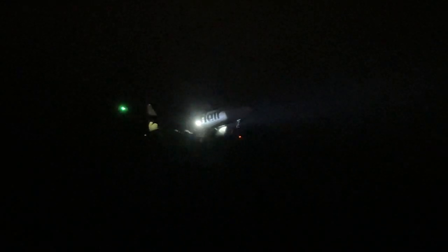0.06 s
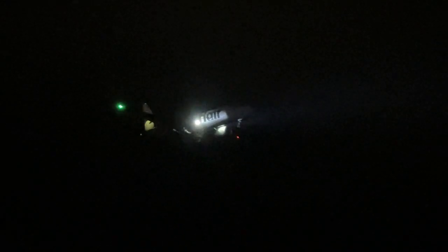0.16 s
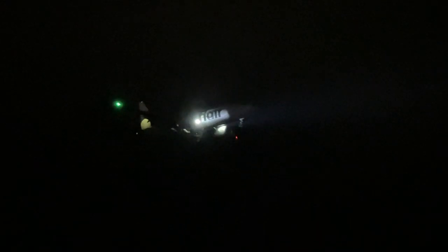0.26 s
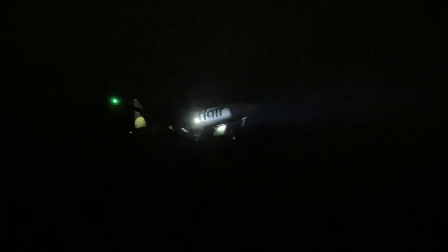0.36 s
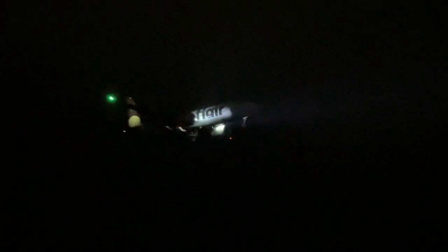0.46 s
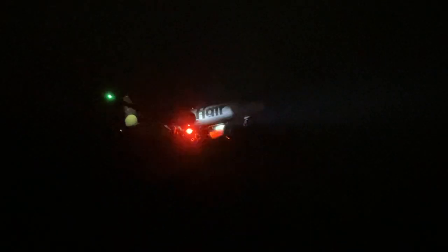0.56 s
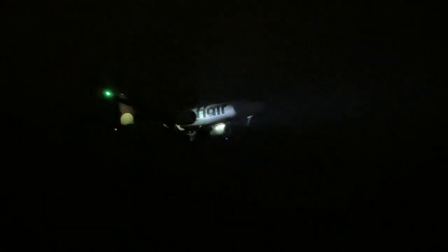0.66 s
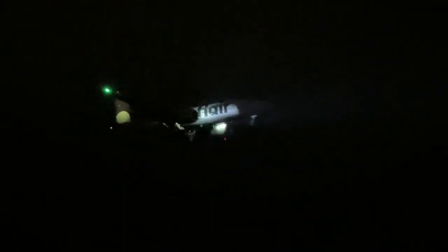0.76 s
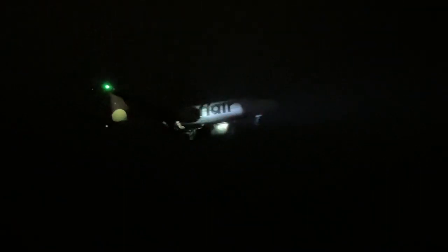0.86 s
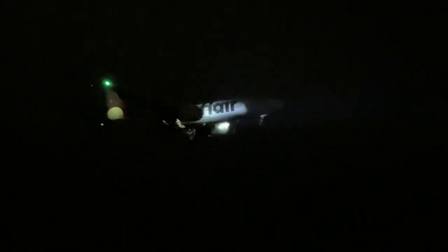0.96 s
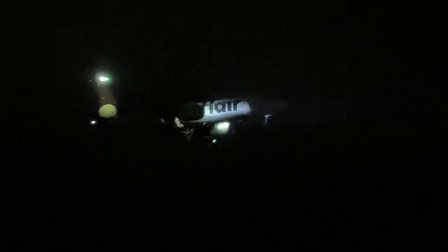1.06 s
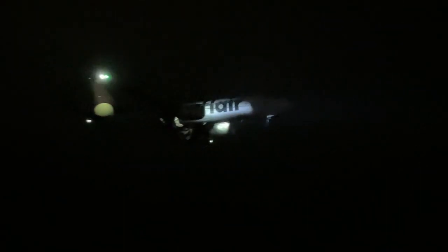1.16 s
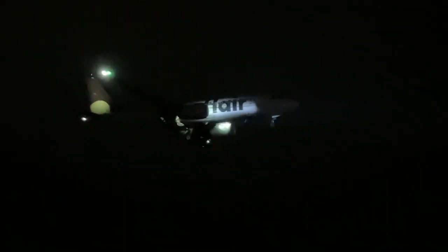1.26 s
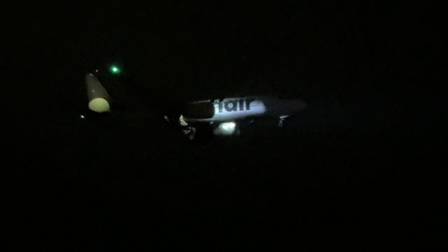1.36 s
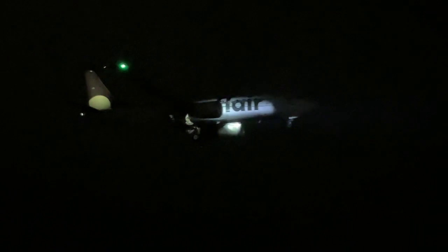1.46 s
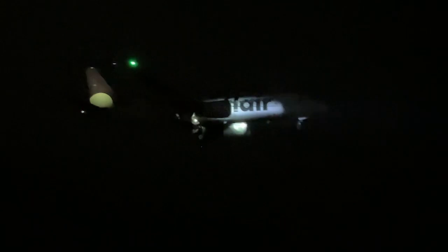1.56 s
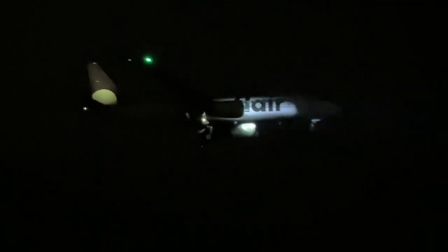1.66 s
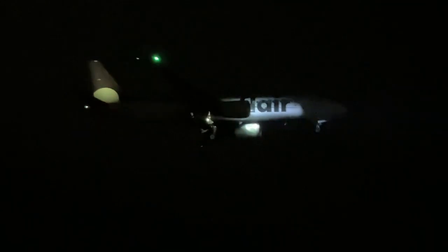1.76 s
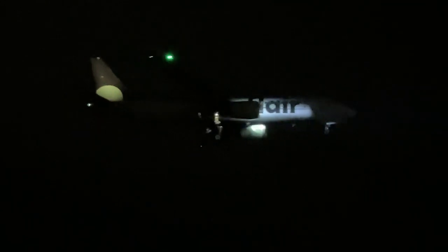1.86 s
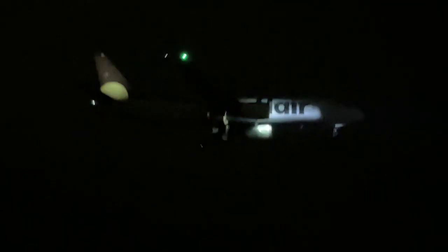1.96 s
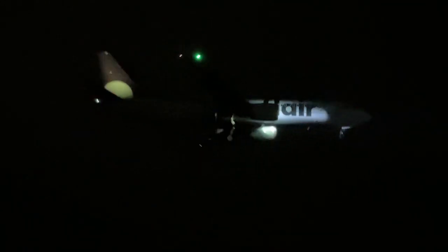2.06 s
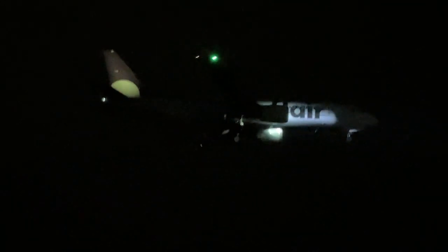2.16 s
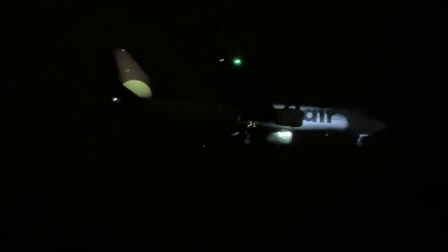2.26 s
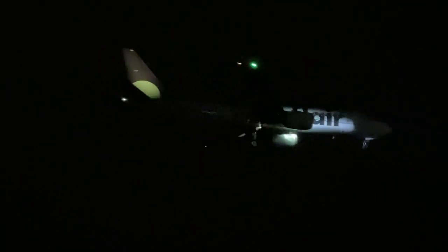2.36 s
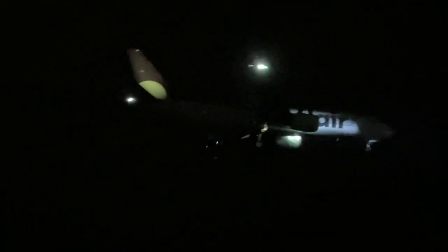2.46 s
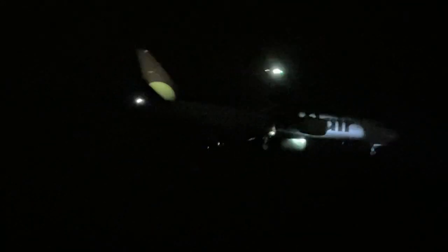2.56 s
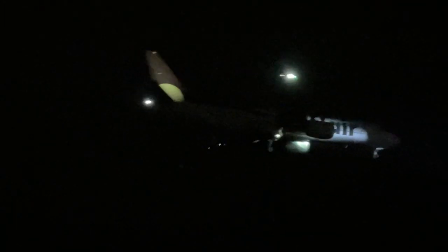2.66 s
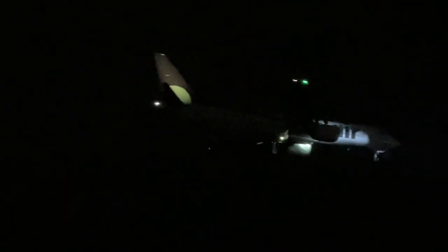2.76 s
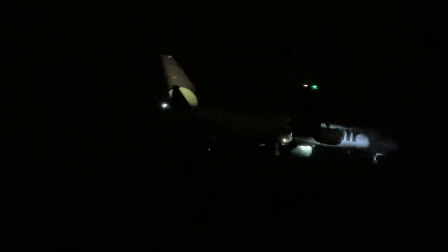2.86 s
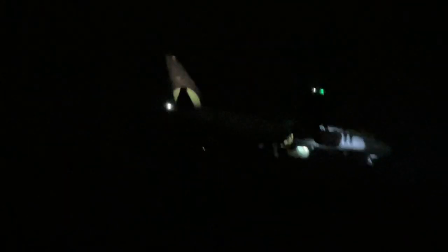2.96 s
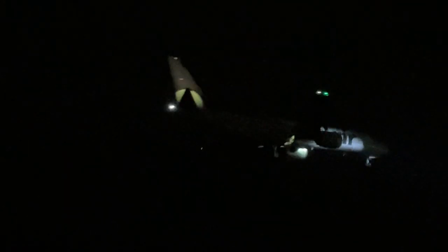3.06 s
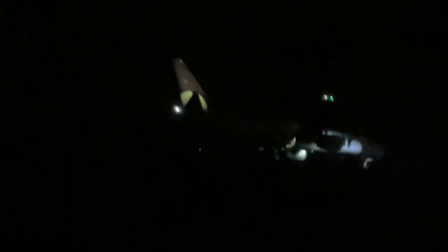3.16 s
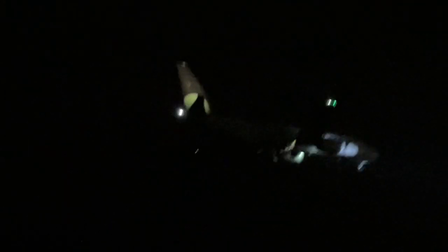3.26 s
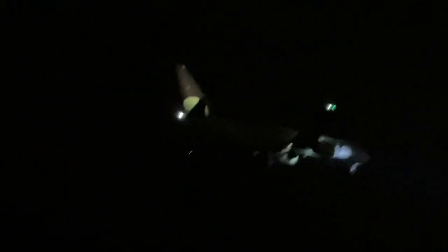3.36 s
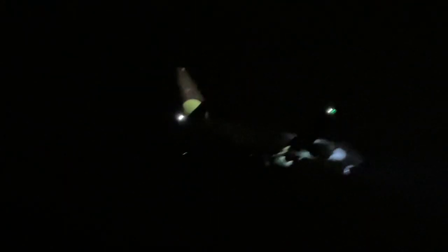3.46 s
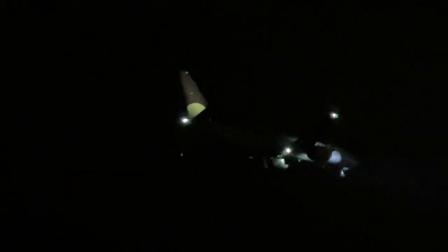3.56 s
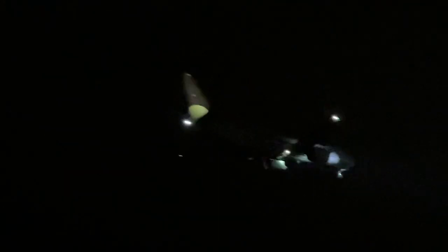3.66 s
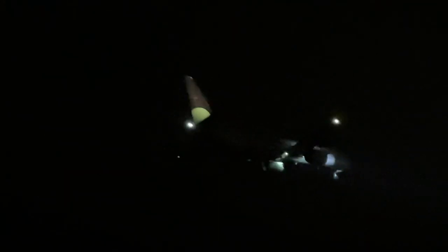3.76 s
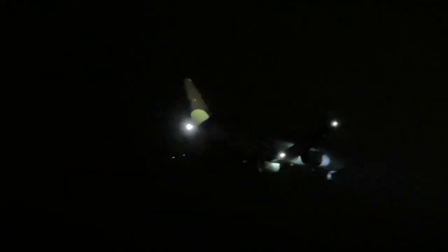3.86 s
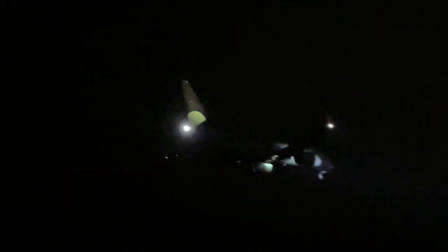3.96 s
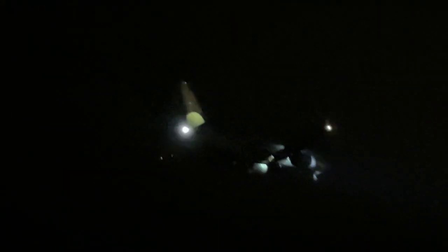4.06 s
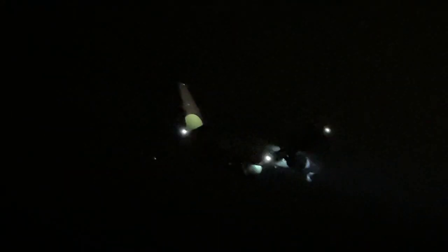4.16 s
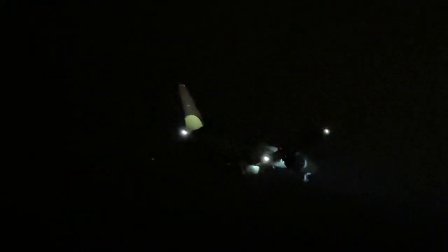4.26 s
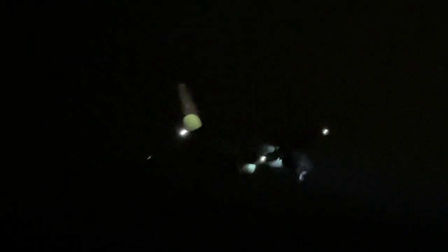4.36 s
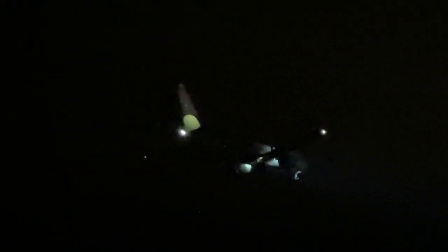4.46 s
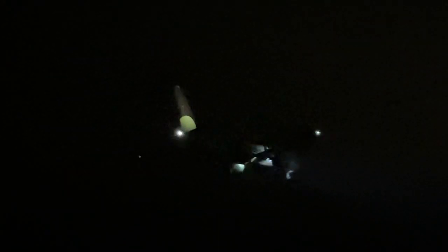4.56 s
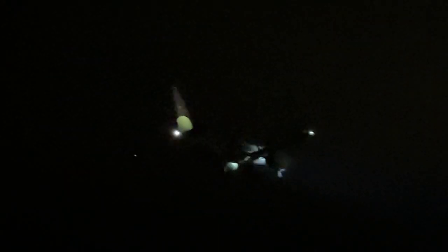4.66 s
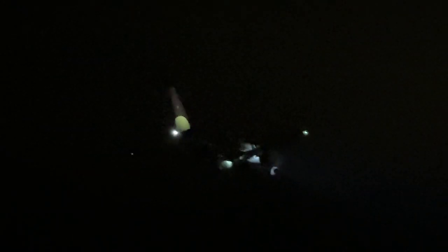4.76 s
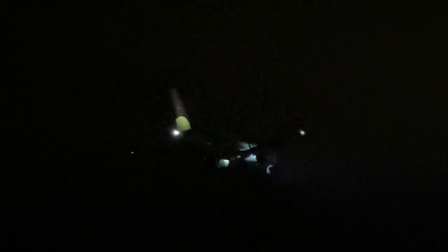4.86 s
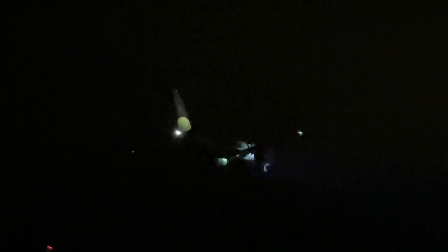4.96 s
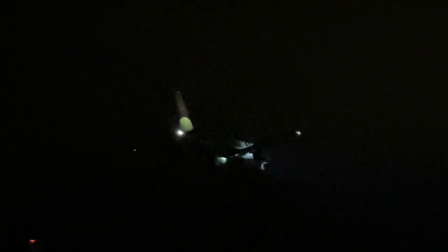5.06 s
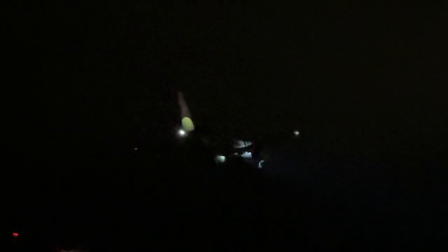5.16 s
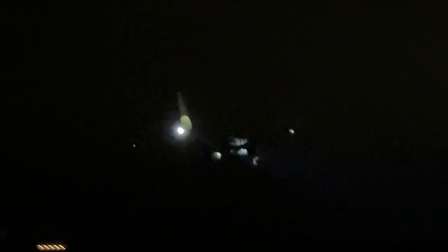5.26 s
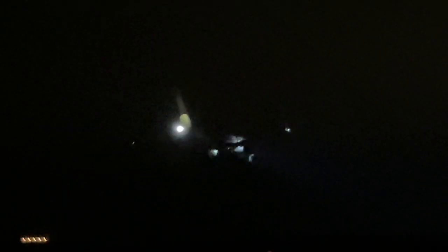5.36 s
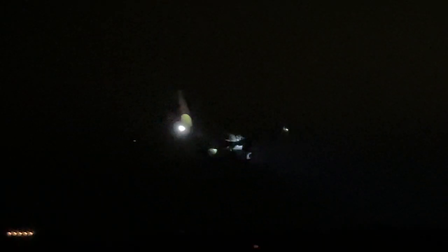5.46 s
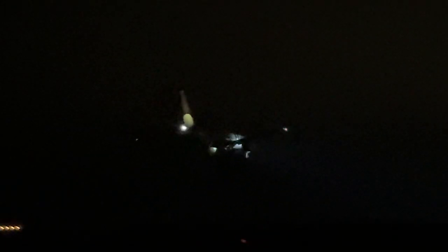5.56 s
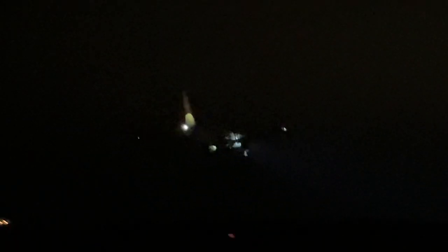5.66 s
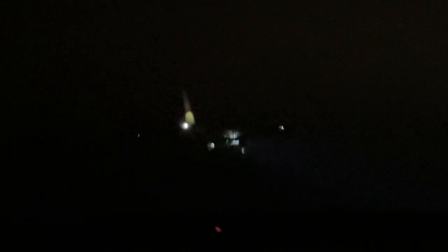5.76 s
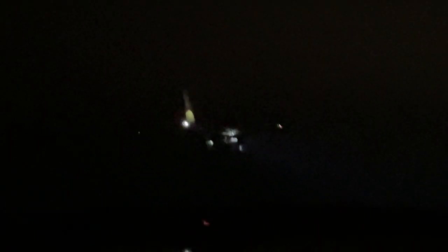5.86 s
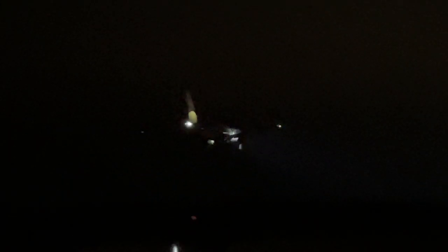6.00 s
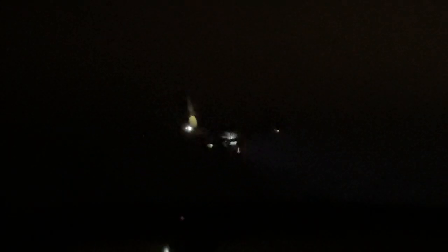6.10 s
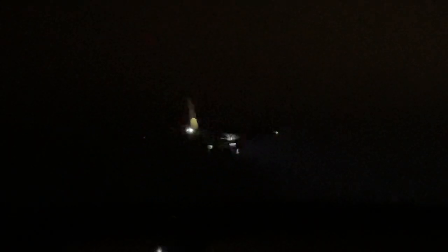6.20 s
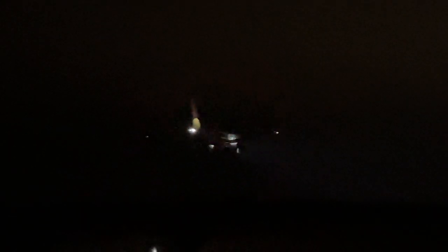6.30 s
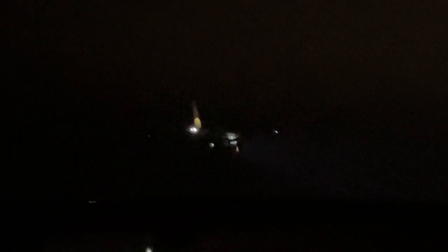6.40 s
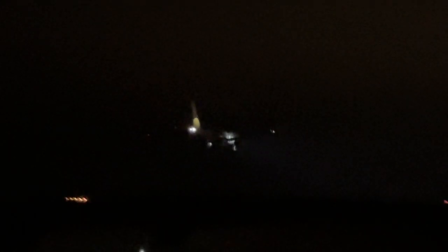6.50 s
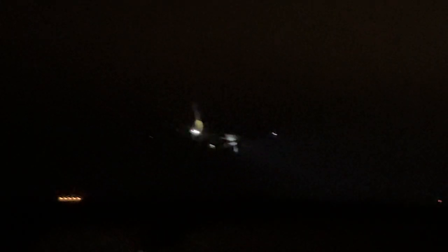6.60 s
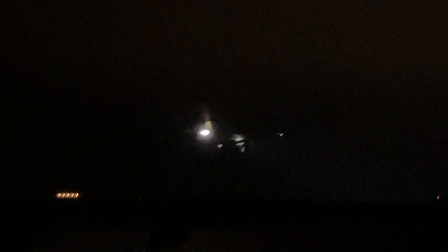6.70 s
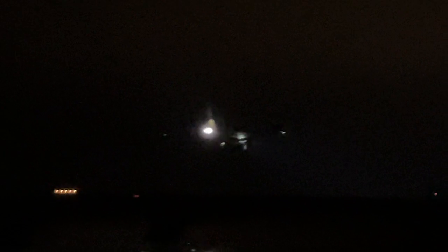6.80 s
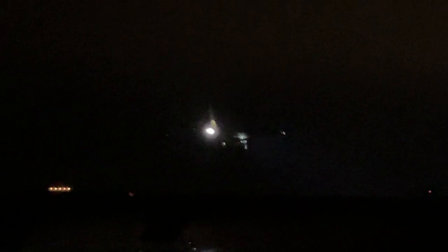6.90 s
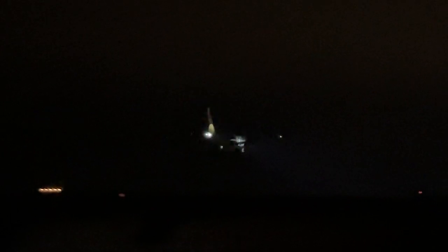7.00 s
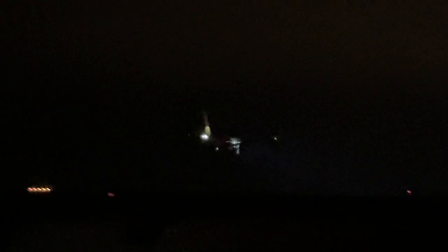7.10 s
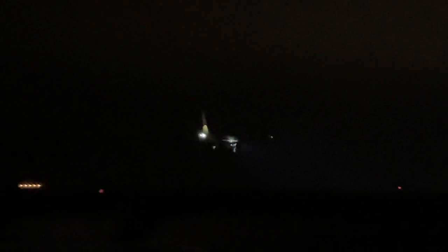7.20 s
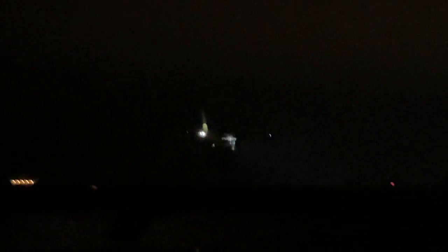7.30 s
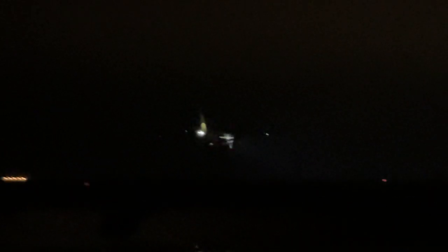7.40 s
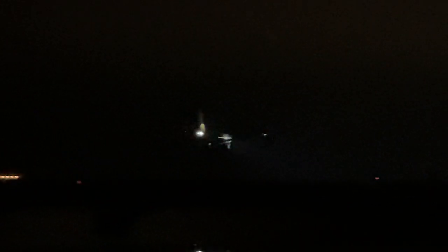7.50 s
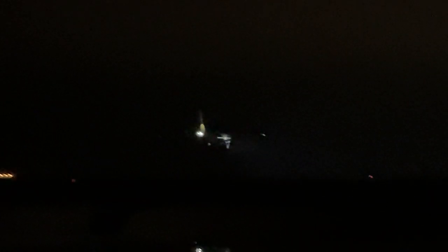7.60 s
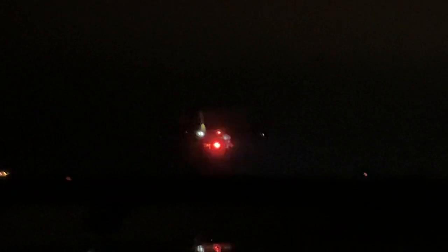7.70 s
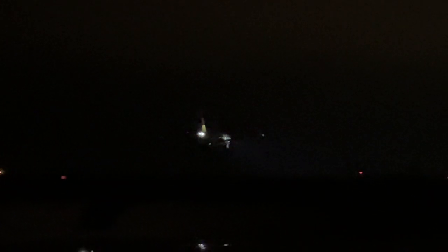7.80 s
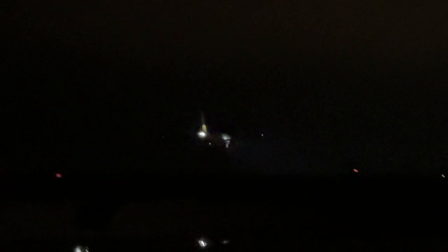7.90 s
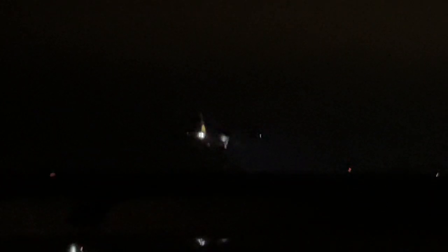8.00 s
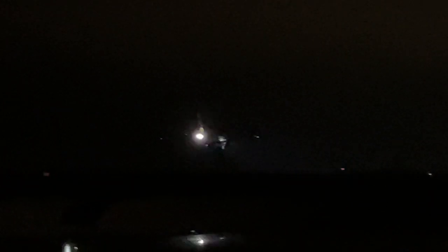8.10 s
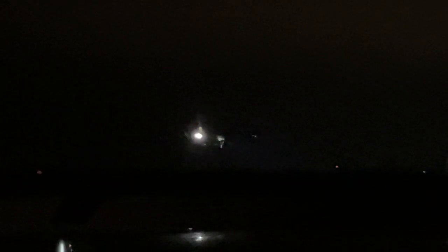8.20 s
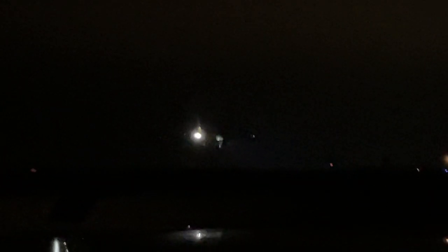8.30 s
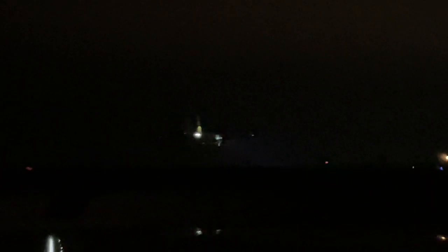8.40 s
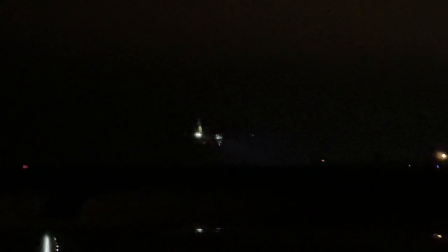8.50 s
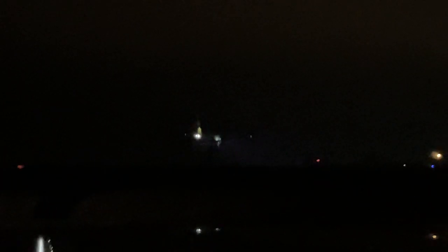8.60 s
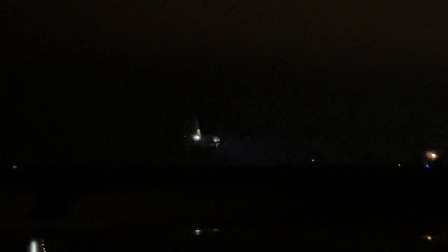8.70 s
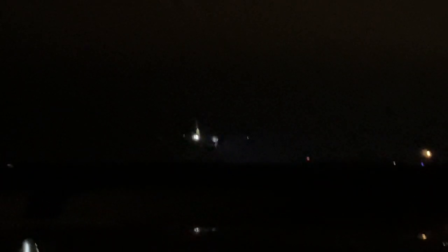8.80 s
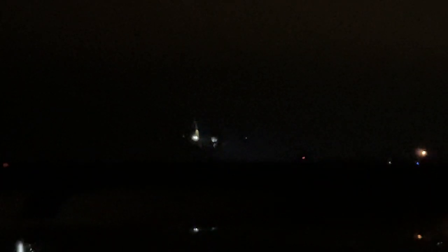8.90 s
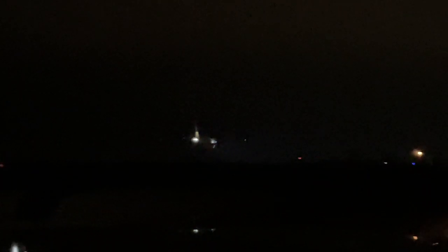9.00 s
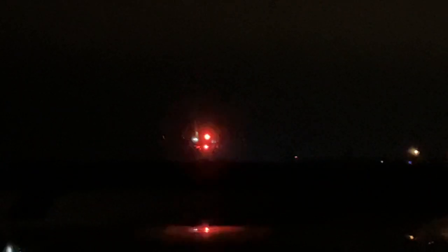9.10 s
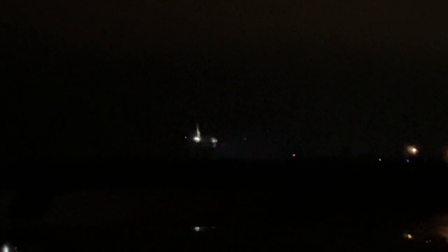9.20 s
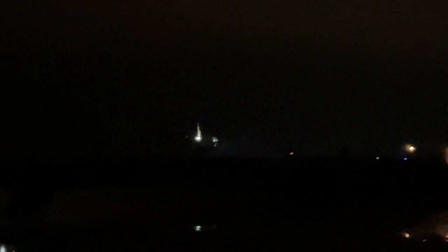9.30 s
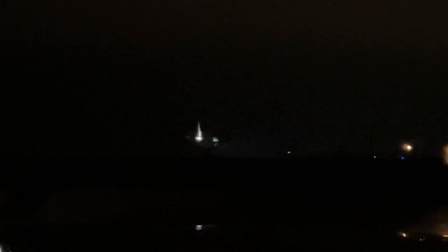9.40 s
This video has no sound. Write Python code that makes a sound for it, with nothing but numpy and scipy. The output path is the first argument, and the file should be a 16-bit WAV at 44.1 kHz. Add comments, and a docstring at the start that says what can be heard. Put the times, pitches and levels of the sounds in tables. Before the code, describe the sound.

Outdoors at night near a runway, a twin-jet airliner already close approaches with bright fan whine, buzz and rushing hiss. It passes at about two seconds, pitch sliding down, rumble and roar at their fullest, then a turbine whine trails behind. The sound fades to a low drone and faint hums, with one tiny handling scuff near the two-port microphone.

```python
"""Under the final approach to a runway: a twin-jet airliner passes low overhead and sinks away.
Exhaust rumble, airframe roar and rush, and fan hiss are filtered noise swept by a ground-echo comb.
Fan, compressor, buzz and turbine tones fall with the Doppler shift; air dulls fan hiss and intake tones.
Steady hums, a low drone and one short scuff with two ticks lie behind; two close microphone ports hear it."""
import sys
import numpy as np
from scipy import signal
from scipy.fft import rfft, irfft, next_fast_len
from scipy.io import wavfile
from scipy.ndimage import uniform_filter1d

SR = 44100
rng = np.random.default_rng(int(sys.argv[2]) if len(sys.argv) > 2 else 0)


def store_wav(level_fs):
    """Save 16-bit WAV to argv[1]."""
    pcm = np.round(np.clip(np.atleast_2d(level_fs), -1, 1) * 32767)
    wavfile.write(sys.argv[1], SR, pcm.T.astype(np.int16))


N = 416744
TIME = np.arange(N) / SR
FRAME = 2048
HOP = FRAME // 8

# Straight, level pass.
SPEED_M_PER_S, CLOSEST_M, ABREAST_S, SOUND_M_PER_S = 70.48, 111.33, 2.1279, 343

# Noise spectra, each scaled to unit rms over the bins. Each row: frequency in Hz, relative density in dB.
RUMBLE_SPECTRUM = [(20, -66), (32, -39.5), (45, -17.5), (60, -1), (100, -1), (130, -1.5), (195, -29),
                   (400, -29.5), (1000, -90)]
ROAR_SPECTRUM = [(60, -36.5), (140, -0.5), (200, 1.5), (280, 1.5), (420, -2), (600, -3.5), (800, -10),
                 (1100, -22.5), (1800, -73.5), (5000, -83.5)]
RUSH_SPECTRUM = [(300, -38), (700, 3), (1050, 4), (1300, 0), (1600, 0.5), (1780, -1), (2050, 2.5),
                 (2450, -2), (2900, -5.5), (3500, -14.5), (4500, -29), (8000, -91)]
FAN_HISS_SPECTRUM = [(1200, -16.5), (2400, 5), (3100, 2.5), (4100, 1), (5200, 0.5), (6200, -3.5),
                     (7300, -10), (8700, -19), (10000, -23), (12000, -34), (14500, -48.5)]
DRONE_SPECTRUM = [(20, -60), (32, -18), (45, -8.5), (58, 7.5), (80, -5.5), (120, -11), (200, -9),
                  (300, -30), (600, -43), (2000, -92)]  # airfield and receding jet
FAR_ROAR_DB, DRONE_DB = -37, -39

# Beamed source levels by name. Each row: held level in dB, hold start in seconds, hold end in seconds,
# rise in dB/s, fall in dB/s. Where the end precedes the start, both slopes act in between.
BEAMS = {"exhaust": (-20.5, 0, 1.9, 0, 7.5), "roar": (-17.5, 0.8, 3.0, 2.5, 7.5),
         "hiss": (-27.3, 0, 3.08, 0, 9), "intake": (0, .6, 1.58, 4, 36),
         "intake sideways": (-20, 11, 2, 12.5, 11.5), "buzz": (0, 1.05, 1.6, 11, 36),
         "scattered whine": (-43, -3, 3.5, 5, 6), "far hiss": (-57.5, 6.5, 5.5, 9, 1.5)}
# Airframe rush. Each row: time in seconds, level in dB.
RUSH_LEVEL = [(0.0, -22), (0.18, -22.5), (1.26, -23), (3.37, -27), (5.26, -40), (5.79, -37.5), (6.63, -42),
              (8.76, -38), (9.37, -38.5), (9.45, -36)]
# Brief hiss swells and dips. Each row: peak in seconds, Gaussian half length in seconds, level change in dB,
# brightening in dB.
HISS_SWELLS = [(.3, 0.2, 2, -0.5), (0.702, 0.1, 2.5, 1.5), (1.134, 0.1, 2, 2.5), (1.488, 0.067, -1.5, 4),
               (3.28, 0.095, 4, 0.5), (3.67, 0.16, 2, -0.5), (4.686, 0.08, 4, 0.5), (5.027, 0.083, 2.5, 1),
               (5.55, 0.29, 0.5, -0.5), (5.952, 0.11, 7, -5)]

# Ground echo. Each row: time in seconds, lag in ms, share of the direct sound as a ratio.
GROUND_ECHO = [(0, 1.7, .7), (.5, 1.96, .74), (1, 2.3, .7), (1.5, 2.78, .58), (2.5, 3.24, .42),
               (3.1, 2.93, .5), (4.2, 2.46, .54), (5.2, 2.33, .42), (7, 2.3, .06)]
# Treble tilt at the closest distance, its loss with distance, and the hiss tilt added when receding.
AIR_NEAR_DB, AIR_DB_PER_M, RECEDING_TILT_DB = 2.5, 0.0846, -0.2

# Engine tones whose lobes sweep past. Each row: frequency at rest in Hz, peak in seconds,
# Gaussian half length in seconds, level in dB, width in Hz.
ENGINE_LOBES = [(1250, 0.45, 0.14, -35.5, 12), (722, 0.4, 0.19, -42, 6.6), (720, 1.4, 0.5, -32.3, 4),
                (712, 2.55, 0.2, -32.5, 5), (1235, 2.2, 0.45, -38, 22), (1250, 3.7, 0.17, -42.5, 14),
                (1724, 2.6, .4, -46, 14), (1930, 5.35, 0.35, -52, 7), (279, 2.88, 0.15, -22, 4),
                (352.4, 3.69, 0.06, -28, 30), (3620, 0.3, 0.25, -38.5, 45), (3620, 1.08, 0.15, -38.3, 60),
                (3800, 0.3, 0.4, -45, 50), (4350, 1.4, 0.3, -43, 45), (4350, 3.25, 0.15, -47, 50),
                (8581, 1.56, 0.063, -46, 30)]
BLADE_HZ, COMPRESSOR_HZ, TURBINE_HZ = 724, 7133, 5722
# Blade-passing harmonics, first upwards, before beam and air. One column: level in dB.
FAN_HARMONIC_DB = [-36, -37.5, -44, -45, -45, -45]
# Compressor tone (fourth entry) and sidebands one blade rate apart, before beam and air.
# One column: level in dB.
COMPRESSOR_LINE_DB = [-44, -47, -51, -49, -55, -58, -63, -66, -68, -72, -76, -82]
# Fan-shaft buzz lines, before beam and air. Each row: frequency at rest in Hz, level in dB.
BUZZ_LINES = [(3790, -49), (5130, -48), (5420, -46), (6800, -59), (8290, -59), (8950, -67), (9450, -68),
              (9750, -72), (10170, -73), (10600, -76), (11250, -80)]
# Turbine whine, beamed aft. Each row: time in seconds, level in dB.
WHINE_LEVEL = [(0, -60), (1.6, -49), (2, -43.5), (2.6, -40.3), (3.25, -37.5), (3.65, -38.7), (4.1, -40),
               (4.35, -46), (4.53, -41), (4.72, -55), (5.03, -48.5), (5.22, -64), (6, -65), (9.45, -90)]
# Upper sidebands come in later; eddies flutter each intake tone (rms).
LATE_DB_PER_KHZ_S, FLUTTER_DB = 2, 1.5

# Hums and noise bands without glide. Each row: frequency in Hz, peak in seconds,
# Gaussian half length in seconds, level in dB, width in Hz.
STEADY_HUMS = [(1726, 1.2, 1.1, -34.5, 100), (2200, 5.2, .6, -42, 340), (4570, 7.7, 1.4, -65.5, 300),
               (1245, 8.3, 1.1, -48, 60), (1460, 8.3, 0.73, -46.5, 170), (380, 4.3, .7, -35, 90),
               (140, 2.3, .6, -32, 45), (265, 2.5, .2, -26, 9), (2050, 8.5, 0.42, -42, 140)]
# Distant hum. Each row: time in seconds, level in dB.
FAR_HUM_LEVEL = [(0, -79), (6.4, -61), (6.85, -51), (7.4, -46), (8, -44), (8.7, -45), (9, -49), (9.45, -46)]
FAR_HUM_HZ = 635.5

# Scuff catches. Each row: start in seconds, level before the band filter in dB.
SCUFF_TICKS = [(6.322, -56), (6.384, -61)]
SCUFF_DB, SCUFF_DECAY_S, TICK_DECAY_S = -66.5, .085, .0028

# Microphone ports. Each row: frequency in Hz, left-right balance in dB, left lead in radians,
# likeness as a ratio.
PORTS = [(60, 0, 0, .999), (140, -.3, -.05, .997), (220, 1, -.2, .985), (350, 3, -.5, .98),
         (470, 0, -1.0, .96), (600, -6, -.9, .94), (800, -6, -.5, .75), (1050, -8, .3, .7),
         (1350, -3, .7, .6), (1600, 1, -.4, .7), (1900, -.5, -1.7, .72), (2200, 1.5, -2.0, .75),
         (2500, 2, -2.7, .9), (2800, 1, -3.1, .96), (3100, 1, -3.7, .92), (3500, 0, -4.9, .87),
         (4200, 0, -5.8, .93), (5200, 0, -5.5, .91), (6200, 0, -5.9, .91), (7300, 0, -5.3, .86),
         (9000, 0, -6.2, .99)]
CUTOFF_HZ = 15000


def turbulence():
    """Exhaust, airframe, fan and drone noise: two unrelated draws, direct and scattered."""
    white_noise = rng.standard_normal((2, N))
    hz, t, white = signal.stft(white_noise, SR, nperseg=FRAME, noverlap=FRAME - HOP)
    hz = hz[:, None]
    distance_m, along_m, _ = flight(t)

    roar_db = together(beam("roar", t), FAR_ROAR_DB)
    hiss_db = together(beam("hiss", t), beam("far hiss", t))
    bright_db = RECEDING_TILT_DB * along_m / distance_m
    for peak_s, half_s, level_db, brightening_db in HISS_SWELLS:
        swell = bell(t, peak_s, half_s)
        hiss_db = hiss_db + level_db * swell
        bright_db = bright_db + brightening_db * swell

    power = band_power(RUMBLE_SPECTRUM, hz, beam("exhaust", t))
    power = power + band_power(DRONE_SPECTRUM, hz, DRONE_DB)
    power = power + band_power(ROAR_SPECTRUM, hz, roar_db)
    power = power + band_power(RUSH_SPECTRUM, hz, in_time(RUSH_LEVEL, t)[0])
    power = power + band_power(FAN_HISS_SPECTRUM, hz, hiss_db) * air(hz, distance_m, bright_db) ** 2

    # eddies along the path make the treble twinkle
    twinkle_depth_db = 0.95 * np.minimum(hz / 4000, 1.5) ** 0.68
    twinkle_db = twinkle_depth_db * eddies(power.shape, bins=70, frames=9)
    gain = np.sqrt(power) * from_db(twinkle_db) * ground_comb(hz, t, rough_hz=1490)
    return signal.istft(white * gain, SR, nperseg=FRAME, noverlap=FRAME - HOP)[1][:, :N]


def engine_tones():
    """Lobed, intake, buzz and turbine tones share one Doppler-shifted, slightly wandering phase."""
    distance_m, _, doppler = flight(TIME)
    wander = 1 + 0.0013 * drift(18)
    turns = 2 * np.pi * np.cumsum(doppler * wander) / SR  # radians per Hz at rest
    tones = swelling_tones(ENGINE_LOBES, turns)
    tones += intake_tones(turns, distance_m, doppler)
    tones += shaft_buzz(turns, distance_m, doppler)
    return tones + turbine_whine(turns)


def intake_tones(turns, distance_m, doppler):
    """Blade harmonics and compressor lines, beamed, fluttering and absorbed by the air."""
    partials = [(k * BLADE_HZ, db) for k, db in enumerate(FAN_HARMONIC_DB, 1)]
    partials += [(COMPRESSOR_HZ + k * BLADE_HZ, db) for k, db in enumerate(COMPRESSOR_LINE_DB, -3)]
    intake_db = together(beam("intake", TIME), beam("intake sideways", TIME))
    early_s = np.maximum(BEAMS["intake"][2] - TIME, 0)
    total = np.zeros(N)
    for hz, db in partials:
        late_db = LATE_DB_PER_KHZ_S * early_s * max(hz - COMPRESSOR_HZ, 0) / 1000
        level_db = db + intake_db - late_db + FLUTTER_DB * drift(12)
        line = tone(hz * turns, width_hz=9 + .005 * hz, steady=1.2)
        total += from_db(level_db) * air(hz * doppler, distance_m) * line
    return total


def shaft_buzz(turns, distance_m, doppler):
    """Fan-shaft lines under one beam, each fluttering and absorbed by the air."""
    total = np.zeros(N)
    for hz, db in BUZZ_LINES:
        level_db = db + FLUTTER_DB * drift(10)
        line = tone(hz * turns, width_hz=25, steady=1.3)
        total += from_db(level_db) * air(hz * doppler, distance_m) * line
    return from_db(beam("buzz", TIME)) * total


def turbine_whine(turns):
    """Turbine tone beamed aft, plus a broad band where it scatters in the exhaust."""
    whine_db = in_time(WHINE_LEVEL, TIME)[0] + 1.2 * drift(16)
    whine = from_db(whine_db) * tone(TURBINE_HZ * turns, width_hz=62, steady=1.35)
    scattered = tone(.99 * TURBINE_HZ * turns, width_hz=380, steady=0)
    return whine + from_db(beam("scattered whine", TIME)) * scattered


def steady_hums():
    """Hums and noise bands at fixed pitch; the distant hum comes through late."""
    hums = swelling_tones(STEADY_HUMS, 2 * np.pi * TIME)
    far_hum = tone(2 * np.pi * FAR_HUM_HZ * TIME, width_hz=12, steady=4)
    return hums + from_db(in_time(FAR_HUM_LEVEL, TIME)[0]) * far_hum


def scuff():
    """Handling near the ports: a tick starts a grainy, decaying rub of band noise, which catches once more."""
    envelope = np.zeros(N)
    for start_s, db in SCUFF_TICKS:
        envelope += from_db(db) * (TIME >= start_s) * np.exp(-np.abs(TIME - start_s) / TICK_DECAY_S)
    age_s = TIME - SCUFF_TICKS[0][0]
    grain = from_db(SCUFF_DB + 3.2 * drift(150))
    envelope += (age_s >= 0) * np.exp(-np.abs(age_s) / SCUFF_DECAY_S) * grain
    band = signal.butter(4, [5200, 10800], "band", fs=SR, output="sos")
    return signal.sosfilt(band, envelope * rng.standard_normal(N))


def flight(t):
    """Distance (m), track position (m) and Doppler factor at arrival times t, allowing for travel time."""
    mach = SPEED_M_PER_S / SOUND_M_PER_S
    flown_m = SPEED_M_PER_S * (t - ABREAST_S)
    squeeze = 1 - mach ** 2
    distance_m = (np.sqrt(flown_m ** 2 + squeeze * CLOSEST_M ** 2) - mach * flown_m) / squeeze
    along_m = flown_m - mach * distance_m
    return distance_m, along_m, 1 / (1 + mach * along_m / distance_m)


def beam(name, t):
    """Level in dB of a beamed source: rise, hold, fall."""
    db, start_s, end_s, rise, fall = BEAMS[name]
    return db - rise * np.maximum(start_s - t, 0) - fall * np.maximum(t - end_s, 0)


def air(hz, distance_m, bright_db=0):
    """Absorption gain: a treble tilt that falls with distance, limited at both ends."""
    tilt_db = AIR_NEAR_DB + bright_db - AIR_DB_PER_M * (distance_m - CLOSEST_M)
    return from_db(tilt_db * np.clip((hz - 4400) / 3400, -.3, 2.6))


def ground_comb(hz, t, rough_hz):
    """Echo interference cuts sweeping notches; rough ground weakens it for short waves."""
    lag_ms, share = in_time(GROUND_ECHO, t)
    strength = np.clip(share, 0, .9) / (1 + (hz / rough_hz) ** 2)
    turn = 2j * np.pi * hz * lag_ms / 1000
    return np.abs(1 + strength * np.exp(-turn)) / np.sqrt(1 + strength ** 2)


def ports(direct, scattered):
    """Each port colours and phase-shifts the sound; scattered sound enters with opposite signs."""
    size = next_fast_len(N + FRAME)
    hz = np.arange(size // 2 + 1) * SR / size
    balance_db, lead_rad, alike = at_hz(PORTS, hz)
    alike = np.clip(alike, 0, 1)
    sign = np.array([[1], [-1]])  # left, right
    common = np.sqrt(1 + alike) * rfft(direct, size)
    opposed = np.sqrt(1 - alike) * rfft(scattered, size)
    colour = from_db(sign * balance_db / 2)
    colour = colour / np.sqrt(np.sum(colour ** 2, axis=0))
    pair = (common + sign * opposed) * colour * np.exp(.5j * sign * lead_rad)
    return irfft(pair, size)[:, :N]


def swelling_tones(rows, turns):
    """Each tone swells and fades once; the narrower, the steadier."""
    total = np.zeros(N)
    for hz, peak_s, half_s, db, width_hz in rows:
        line = tone(hz * turns, width_hz, steady=3 * np.exp(-width_hz / 40))
        total += from_db(db) * bell(TIME, peak_s, half_s) * line
    return total


def tone(phase, width_hz, steady):
    """Unit-power tone, smeared into a narrow band by random quadrature gains."""
    phase = (phase % (2 * np.pi)).astype(np.float32)
    in_quadrature = drift(2 * width_hz) * np.cos(phase)
    in_phase = (steady + drift(2 * width_hz)) * np.sin(phase)
    return rms_one(in_quadrature + in_phase)


def band_power(spectrum, hz, level_db):
    """Power per bin and frame from a spectrum and a level curve."""
    shape = rms_one(from_db(at_hz(spectrum, hz)[0]))
    return (shape * from_db(level_db)) ** 2


def eddies(shape, bins, frames):
    """Unit-rms random field over frequency and time, smoothed twice."""
    field = rng.standard_normal(shape)
    for _ in range(2):
        field = uniform_filter1d(field, bins, axis=0)
        field = uniform_filter1d(field, frames, axis=1)
    return rms_one(field)


def drift(rate_hz):
    """Unit-rms random curve with rate_hz knots a second."""
    knots = rng.standard_normal(16384)
    return rms_one(np.interp(TIME * rate_hz, np.arange(len(knots)), knots))


def bell(t, peak_s, half_s):
    """Gaussian swell of height 1."""
    return np.exp(-.5 * ((t - peak_s) / half_s) ** 2)


def together(a_db, b_db):
    """Power sum in dB of two unrelated sounds."""
    return 10 * np.log10(from_db(a_db) ** 2 + from_db(b_db) ** 2)


def in_time(rows, t):
    """Table columns interpolated at times t."""
    seconds, *columns = np.transpose(rows)
    return [np.interp(t, seconds, column) for column in columns]


def at_hz(rows, hz):
    """Table columns interpolated on a log-frequency axis."""
    points_hz, *columns = np.transpose(rows)
    return [np.interp(np.log(hz + 1), np.log(points_hz), column) for column in columns]


def from_db(db):
    """Decibels to gain."""
    return 10 ** (np.asarray(db) / 20)


def rms_one(x):
    """Scale to unit power."""
    return x / np.sqrt(np.mean(np.abs(x) ** 2) + 1e-20)


def scene():
    """Passing aircraft and background at the two ports."""
    direct, scattered = turbulence()
    direct = direct + engine_tones() + steady_hums() + scuff()
    return ports(direct, scattered)


def record(dry):
    """Steep low-pass: 60 dB down from 500 Hz above the cutoff."""
    low_pass = signal.cheby2(14, 60, CUTOFF_HZ + 500, fs=SR, output="sos")
    return signal.sosfilt(low_pass, dry)


dry = scene()
out = record(dry)
store_wav(out)
```